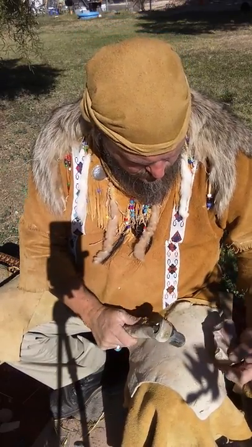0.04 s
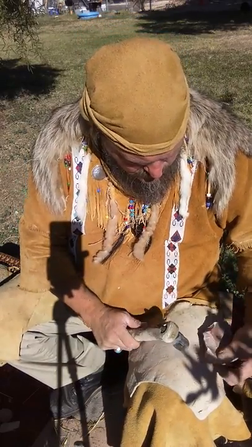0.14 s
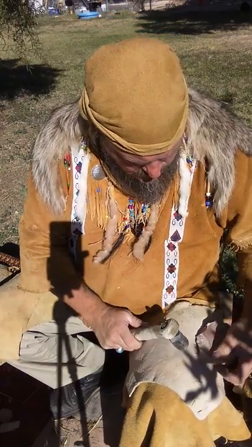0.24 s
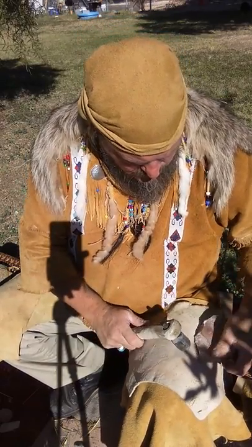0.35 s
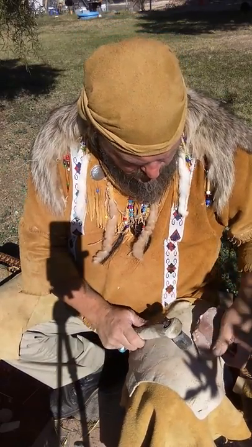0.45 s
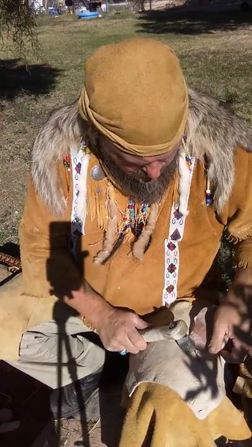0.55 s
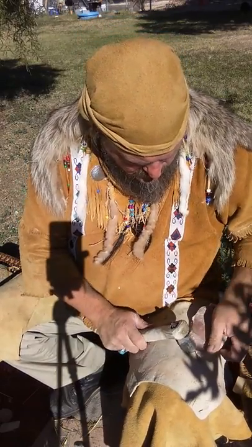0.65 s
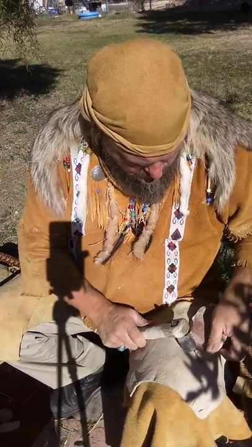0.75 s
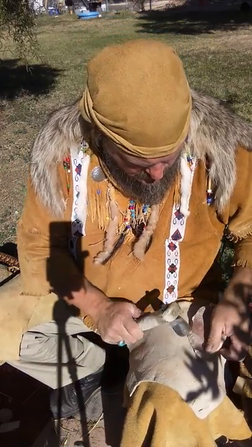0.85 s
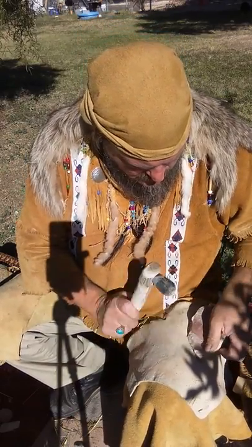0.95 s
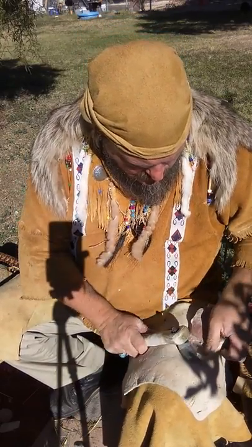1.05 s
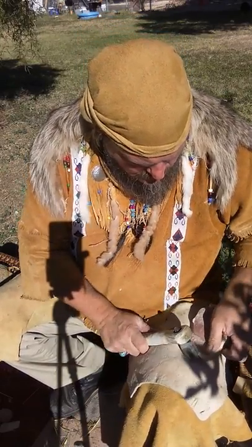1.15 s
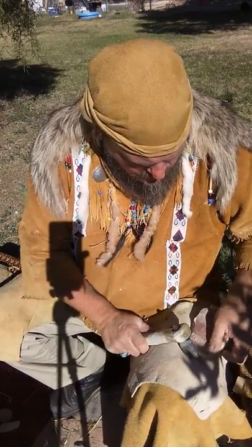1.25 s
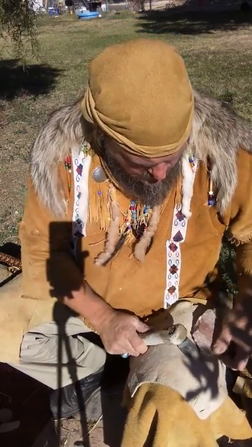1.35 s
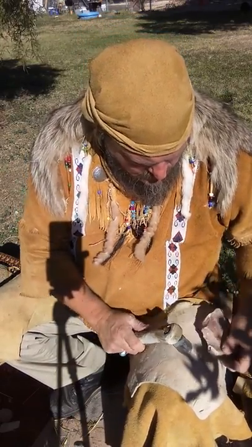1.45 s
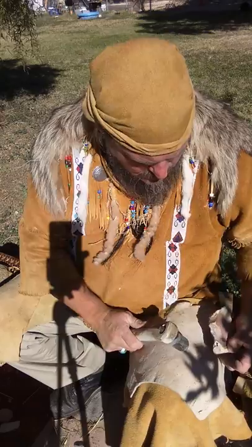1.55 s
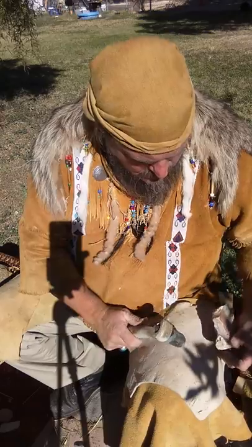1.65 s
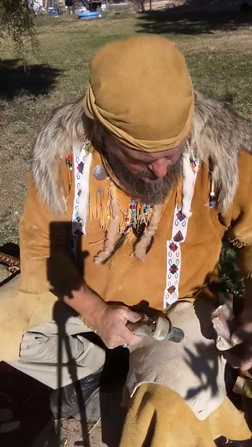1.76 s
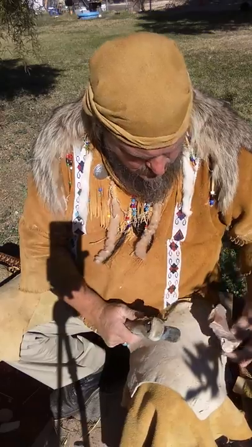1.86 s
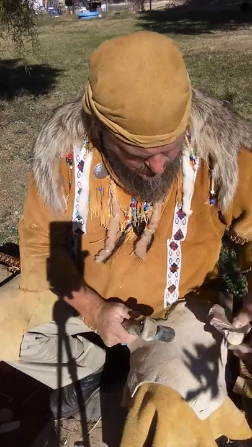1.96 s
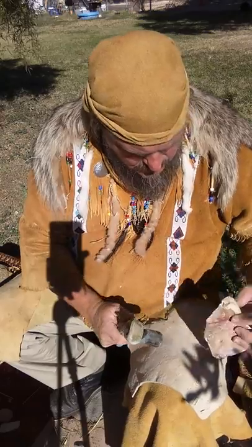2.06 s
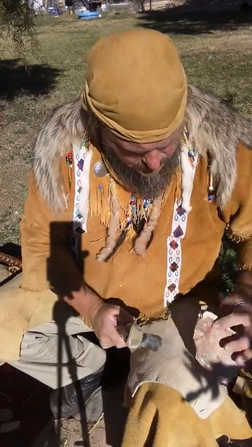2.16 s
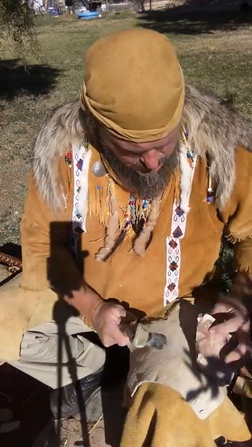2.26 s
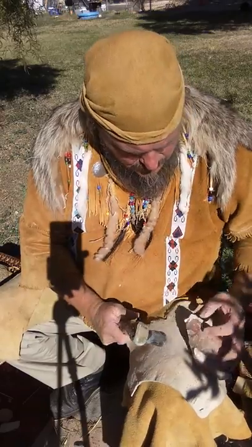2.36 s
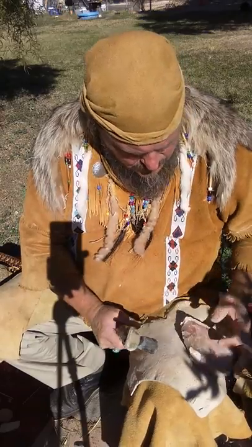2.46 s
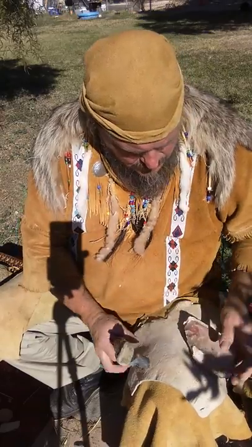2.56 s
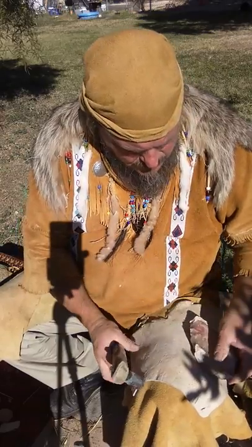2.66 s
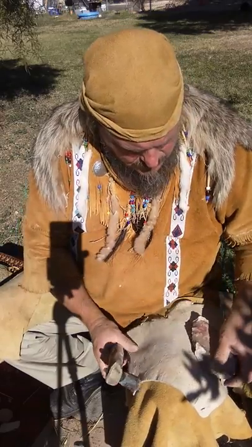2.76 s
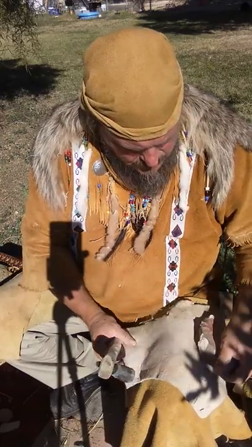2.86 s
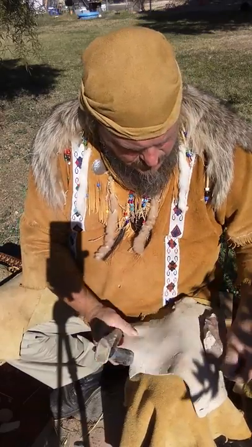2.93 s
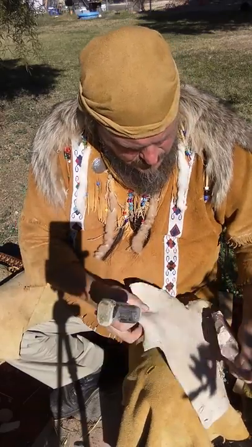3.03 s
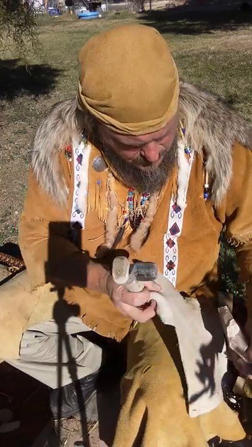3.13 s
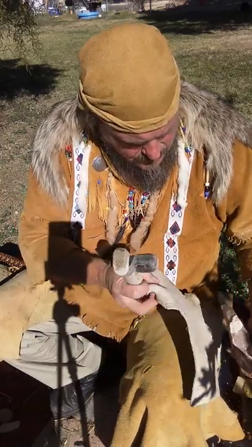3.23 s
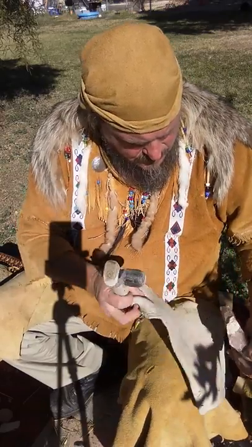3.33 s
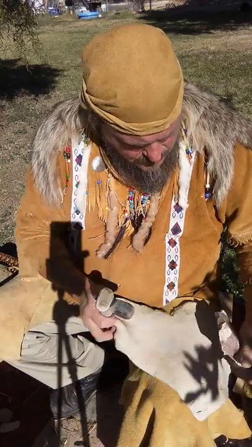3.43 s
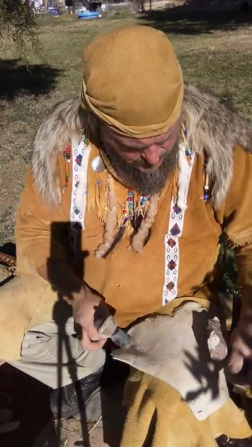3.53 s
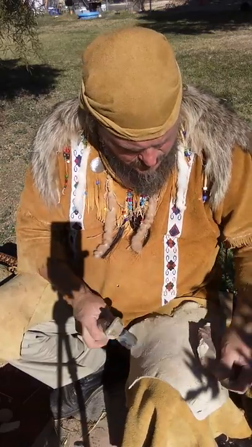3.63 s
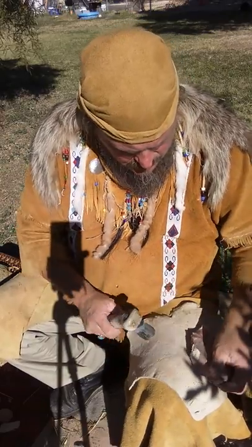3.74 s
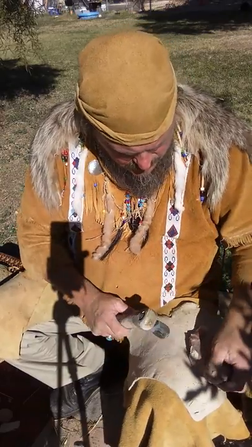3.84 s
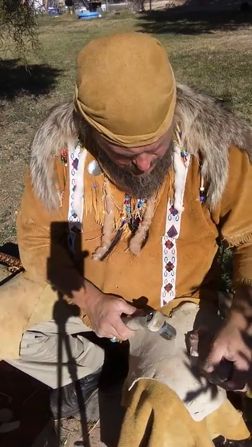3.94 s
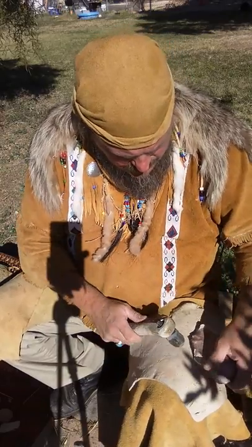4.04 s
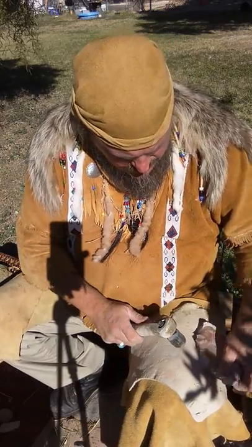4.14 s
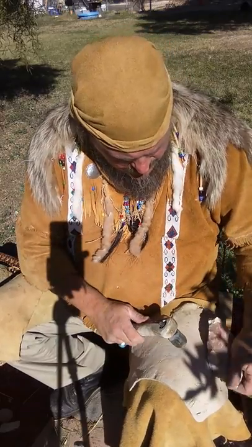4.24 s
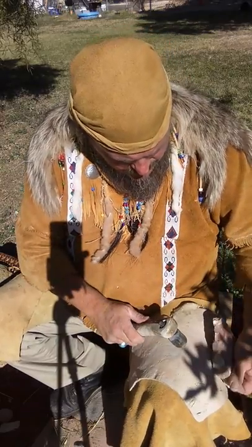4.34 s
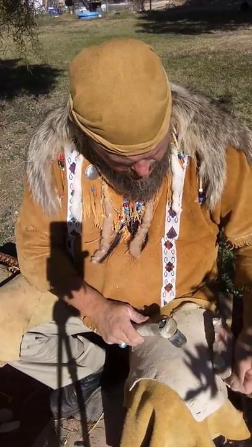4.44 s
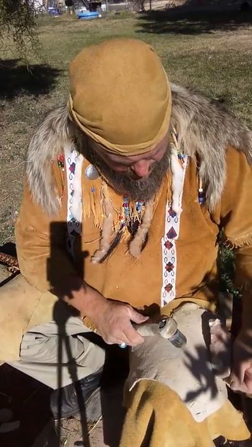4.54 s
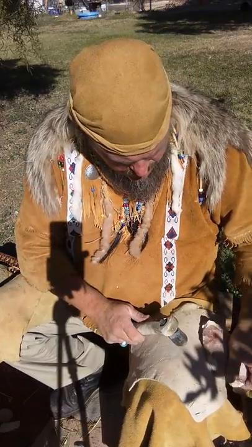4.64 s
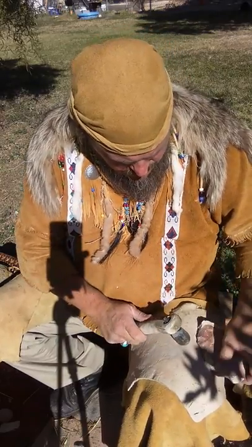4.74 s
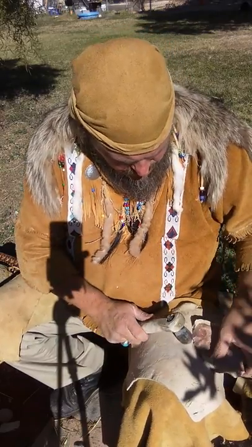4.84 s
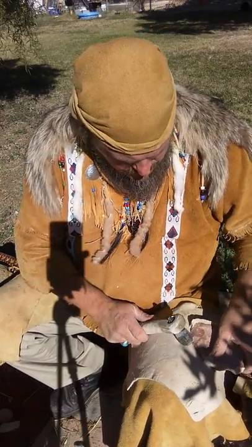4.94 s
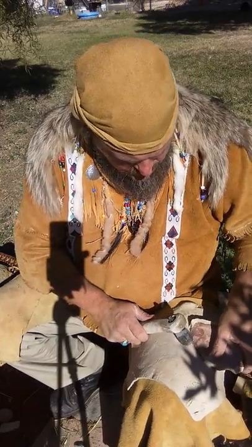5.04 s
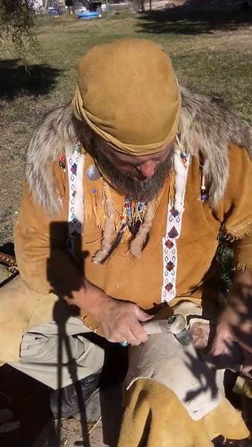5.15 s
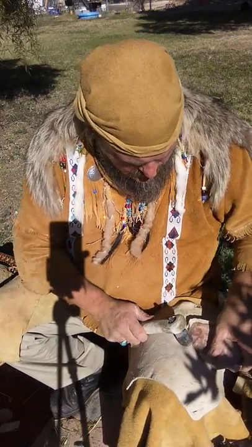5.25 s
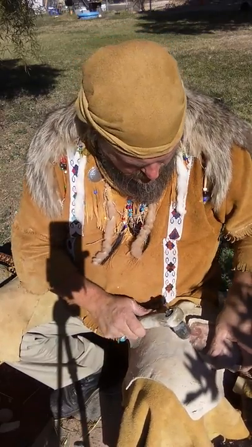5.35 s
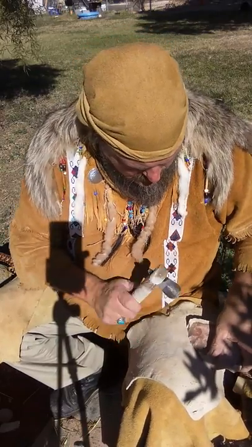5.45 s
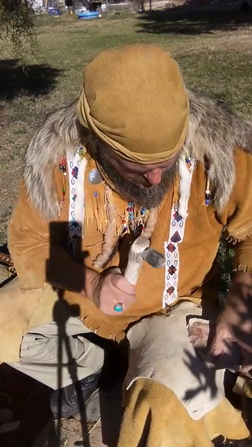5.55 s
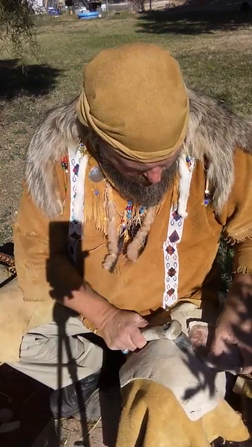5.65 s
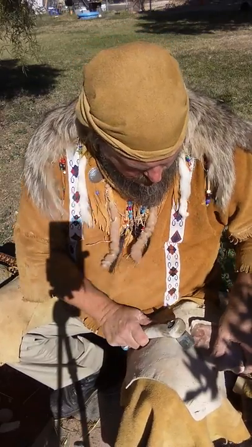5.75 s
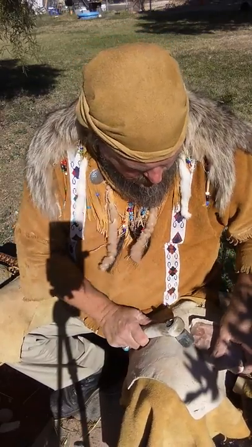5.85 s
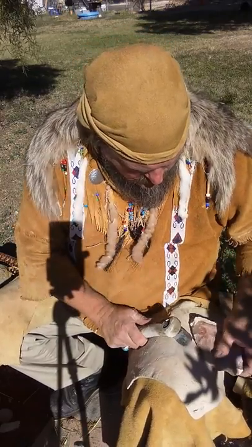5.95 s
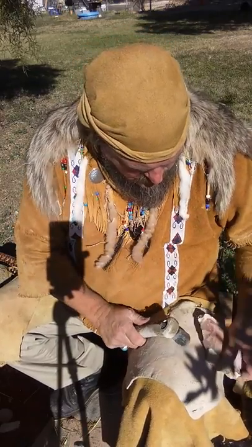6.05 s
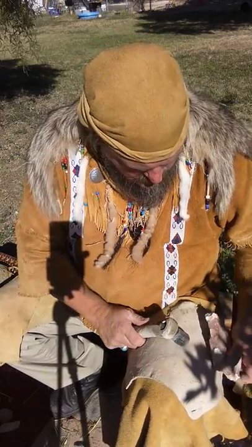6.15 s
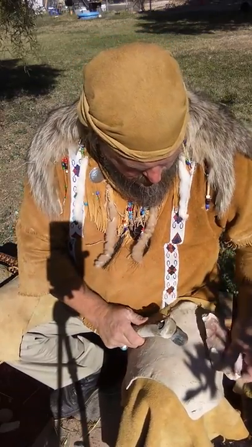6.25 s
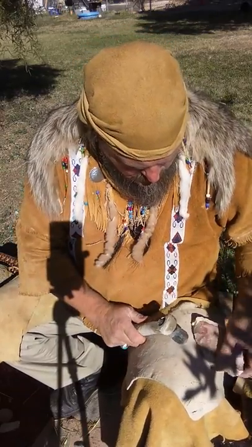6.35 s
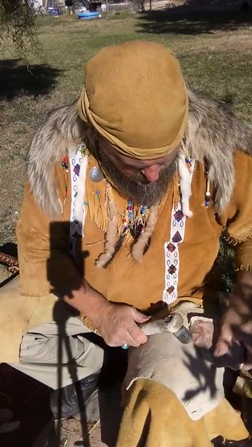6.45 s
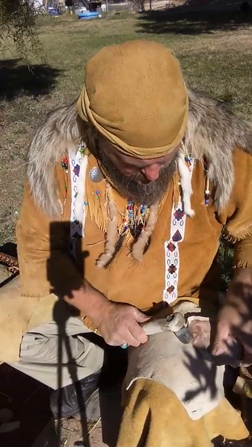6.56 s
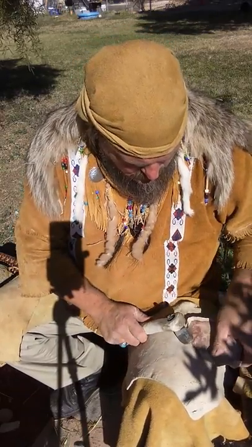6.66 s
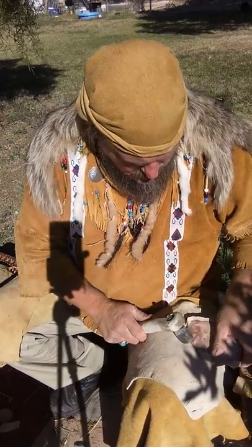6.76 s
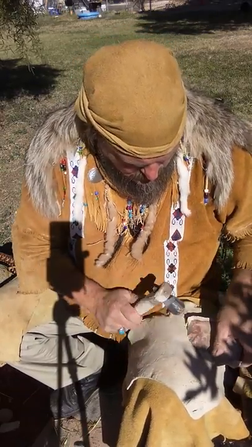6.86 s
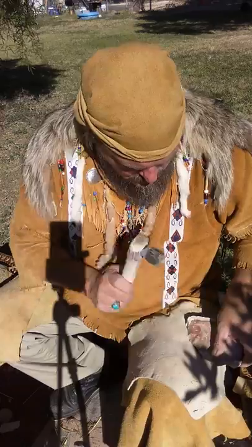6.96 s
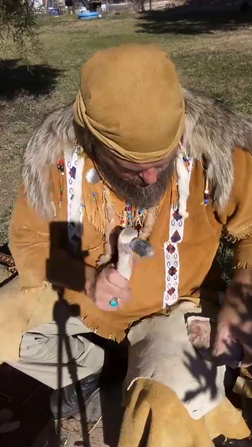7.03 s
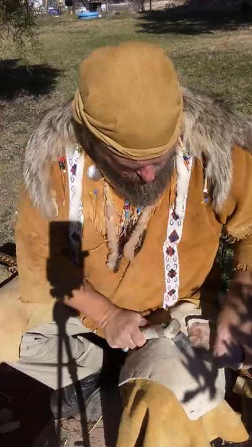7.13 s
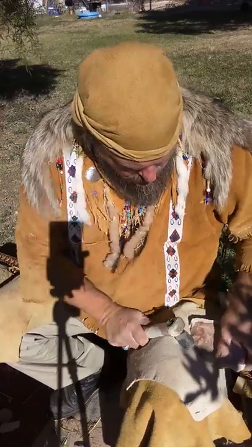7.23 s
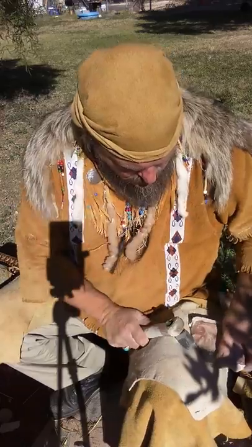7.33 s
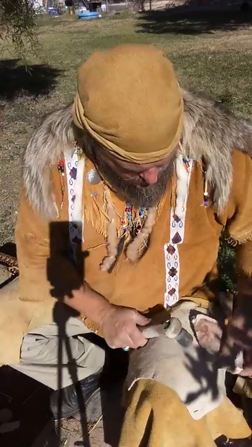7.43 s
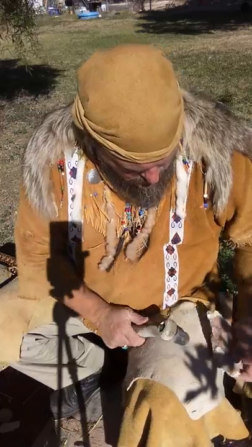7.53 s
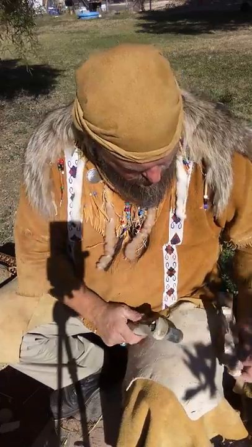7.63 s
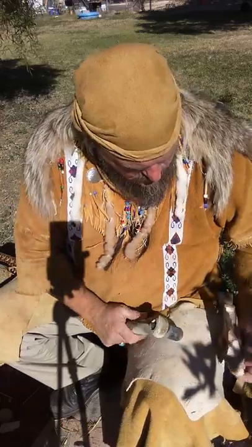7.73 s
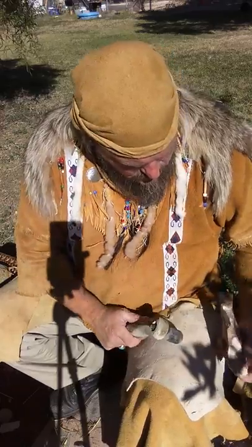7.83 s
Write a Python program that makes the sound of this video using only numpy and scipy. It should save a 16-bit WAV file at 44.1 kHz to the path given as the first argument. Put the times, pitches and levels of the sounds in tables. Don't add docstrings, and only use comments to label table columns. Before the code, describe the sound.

A hammer strikes flint held on a leather-covered thigh, recorded close in an open yard. One dry, bright click, a long pause of leather rubbing and tiny ticks, then two loud snapping blows about one and a half seconds apart, scattering small clinking chips. Wind rumbles and pops unevenly on the microphone over faint traffic, crickets, brief bird whistles, a descending distant whine and two faraway barks.

```python
import sys
import numpy as np
from scipy import signal
from scipy.fft import rfft, irfft, next_fast_len
from scipy.io import wavfile
from scipy.ndimage import uniform_filter1d, map_coordinates

SR = 44100
rng = np.random.default_rng(int(sys.argv[2]) if len(sys.argv) > 2 else 0)


def gain_from_db(level_db):
    decades = np.asarray(level_db, float) / 20
    return 10 ** decades


def to_wav(sig):
    pcm = np.clip(np.atleast_2d(sig), -1, 1) * 32767
    pcm = np.round(pcm).astype(np.int16)
    wavfile.write(sys.argv[1], SR, pcm.T)


N = 347949
T = np.arange(N) / SR

# time in seconds, peak in dB, left-right in dB, thigh thump in dB, slap-back in dB.
BLOWS = [
    (0.9725, -6, 9, -40, -50),
    (5.5808, -1.5, 6.5, -19.5, -32),
    (7.042, -2.5, 6, -16.5, -37),
]
# frequency in Hz, level in dB, t60 in seconds.
STONE_MODES = [
    [(1002, -16, 0.024), (1500, -11, .03), (1675, -1.5, 0.037), (1945, -9, .03), (2300, -4, .03),
     (2600, -10.5, 0.06), (3450, -6.5, 0.033), (3760, -8, 0.038), (4360, -11, 0.039), (5960, -19, .04),
     (9400, 2.5, .05), (13080, -14.5, .045), (14930, -13.5, .022)],
    [(1503, -5.5, .05), (1950, -7.5, .05), (2220, -10, 0.029), (2691, -7.5, 0.056), (3430, -7, .045),
     (3410, -1.5, .04), (3830, -7.5, 0.034), (4405, -10.5, .035), (4740, -12, .035), (5620, -12.5, 0.026),
     (7704, -14.5, .04), (8440, -14.5, .05), (12990, -18, .032)],
    [(1498, -8.5, 0.049), (1640, -10.5, 0.044), (1950, -12, .04), (2208, -3.5, .04), (2690, -11, 0.075),
     (3286, -7, 0.036), (3476, -1, .05), (3975, -9.5, 0.036), (4060, -9, .04), (4680, -8, 0.057),
     (5480, -14, .05), (8200, -18, 0.089), (10070, -18, 0.041), (12300, -23.5, 0.053)],
]
# frequency in Hz, density in dB per Hz.
CRACK_SPECTRA = [
    [(88, -55), (250, -13), (500, -20), (1160, -10), (1680, -4.5), (2000, -7.5), (2400, -5.5), (2910, -14),
     (3470, -6), (7600, -23), (9440, -10.5), (10400, -27), (13400, -16), (16400, -46)],
    [(160, -36), (280, -25), (420, -16), (1130, -21), (1500, -12), (3060, -13), (3520, -4.5), (4110, -10),
     (5600, -12.5), (6850, -21), (7520, -9.5), (9500, -22.5), (13000, -23), (15100, -27), (16400, -43)],
    [(180, -44.5), (300, -14), (500, -16), (720, -18.5), (968, -16), (1520, -16.5), (1950, -13), (2270, -7),
     (2600, -18), (3630, -6.5), (5420, -18.5), (8950, -21), (12700, -23), (14800, -30), (16400, -49)],
]
CRUSH_S = [0.004, 0.0035, .005]
# frequency in Hz, level over the thump in dB, t60 in seconds.
THIGH_MODES = [(330, 7.5, 0.012), (444, 4, 0.051), (617, 5.5, 0.063), (700, 9, 0.049)]
# frequency in Hz, level in dB.
GRIT_SPECTRUM = [(600, -29), (1400, -9.5), (1900, -11.5), (2600, -1), (3200, -7.5), (3800, -2.5),
                 (4500, -11), (6500, -17), (12000, -24.5), (16000, -39)]
LEAD_S, LEAD_DB = .0013, -20.5
# delay in seconds, level in dB.
WALLS = [(.035, -40), (.078, -44), (.1, -48)]
# frequency in Hz, t60 in seconds.
YARD_T60 = [(300, 0.055), (1500, 0.95), (3500, 0.14), (6000, 0.13), (12000, 0.039)]
# frequency in Hz, level in dB.
ECHO_COLOUR = [(300, -17), (1000, -13.5), (2000, -3.5), (3800, -1.5), (4600, -4.5), (6000, -12),
               (9000, -16.5), (16000, -32)]
# frequency in Hz, gain in dB.
PORT_SHADE = [(250, 15), (500, 6), (1100, 2), (1800, 6), (2600, 4.5), (3300, 1.5), (4300, -0.23),
              (9000, -2)]
# frequency in Hz, phase in radians.
PORT_LAG = [(250, -2.5), (800, -2), (1600, -1.5), (2500, -1.28), (3300, 1.04), (5000, 1.63), (8000, 1.93),
            (12000, 0.8)]

# time in seconds, peak in dB, centre in Hz, t60 in seconds,
# left-right in dB.
TAPS = [(0.001, -44, 1500, 0.011, -1), (0.255, -60.5, 3880, 0.21, 19), (0.275, -52.5, 3460, 0.081, 23),
        (0.508, -56, 3930, 0.055, 21), (.752, -44.5, 4400, 0.015, 19), (1.245, -54.5, 4170, 0.082, 17),
        (1.262, -54.5, 4164, 0.092, 16), (3.5215, -44, 899, .04, 7), (3.5205, -32.5, 343, 0.035, 16.5),
        (2.6345, -43, 3848, 0.018, 22), (3.5256, -26.5, 1120, 0.02, 18), (3.527, -47, 3620, 0.019, 14),
        (4.646, -57, 5920, 0.018, 25), (7.12, -39, 2600, 0.019, 6), (7.138, -38, 2800, 0.018, 23),
        (7.152, -45, 2800, 0.13, 22)]
# time in seconds, peak in dB, centre in Hz, t60 in seconds, left-right in dB.
CLINKS = [
    (2.197, -54, 4780, 0.017, 11),
    (4.646, -56, 1757, 0.032, 18),
    (5.128, -48.5, 4590, 0.018, 5.9),
    (6.485, -48, 3560, 0.054, 9.1),
]
# time in
# seconds, peak in dB, centre in Hz, t60 in seconds,
FLAKES = [(1.002, -38, 1620, .04, 13), (1.024, -44, 1500, .06, 18), (1.051, -57, 2380, .03, 17),
          (1.069, -56, 2650, 0.028, 9), (1.085, -41.5, 1640, 0.044, 12), (1.109, -45, 1500, 0.073, 12),
          (1.115, -54, 3790, 0.027, 11), (1.171, -54, 1500, 0.031, 15), (5.606, -30.5, 2590, 0.035, 11),
          (5.638, -32.5, 3700, 0.045, 19), (5.659, -37, 2500, .03, 8), (5.67, -42.5, 3570, 0.077, 17),
          (5.678, -41, 2640, 0.033, 18), (5.689, -37, 3880, 0.079, 10), (5.693, -43, 2850, 0.068, 19),
          (5.7155, -42, 1650, 0.042, 15), (5.7, -44, 3500, .03, 6), (5.72, -35, 3730, 0.07, 14),
          (7.071, -32, 2686, .04, 16), (7.104, -41, 3900, .03, 18), (7.149, -43, 3660, 0.036, 14),
          (7.158, -44, 2700, .03, 6), (7.1765, -37, 2300, .03, 8), (7.181, -39, 1510, 0.035, 14),
          (7.182, -43, 4020, 0.089, 18)]
# time in seconds, peak in dB, centre in Hz.
TICKS = [(0.5065, -38, 12800), (0.7526, -40.5, 9000), (2.31, -48, 11200), (2.339, -50, 9300),
         (2.361, -45, 7600), (2.3759, -46, 12400), (2.5292, -34.5, 12400), (3.039, -49.5, 8400),
         (3.1898, -43.5, 9070), (3.266, -42, 9150), (3.3187, -39.5, 9050)]
TICK_T60_S, TICK_PAN_DB = 0.0079, 16.5
TAP_WIDE, CLINK_WIDE, FLAKE_WIDE = 0.7, 0.2, .11

# start in seconds, length in seconds, level in dB,
# bright hiss over dull rub in dB.
MOVES = [(0.246, 0.2, -71.5, -3.5), (0.507, 0.1, -64.5, -0.5), (0.598, 0.27, -69.5, -6),
         (1.0, 0.35, -73, 1.5), (1.915, 0.15, -77.5, 4), (2.15, .15, -80.5, 3), (2.309, 0.21, -69.5, -1),
         (2.519, 0.2, -68, -2.5), (2.724, 0.17, -68.5, -3), (2.867, 0.19, -68.5, -1.5),
         (3.003, 0.067, -63.5, -9), (3.07, 0.62, -73.5, -2), (3.479, 0.68, -74.5, -15),
         (3.932, 0.34, -68, -0.5), (5.277, 0.22, -76, -22), (5.548, 0.39, -69.5, -6.5),
         (5.851, 0.47, -75, -24.5), (6.4, 0.23, -77.5, 1.5), (6.818, 0.078, -78, -1),
         (7.013, 0.32, -68.5, -2.5), (7.298, 0.36, -71.5, -9)]
MOVE_EDGE_S = .035, 0.14
STILL_DB = -80.5
# frequency in Hz, level in dB.
RUB_SPECTRUM = [(400, -25.5), (1000, 0.5), (2500, -3.5), (4500, -3), (6000, -13), (9000, -26)]
# frequency in Hz, level in dB.
HISS_SPECTRUM = [(3500, -26.5), (6000, -3), (9000, 3.5), (13000, 0), (15600, -2), (16200, -32)]
# end of the arm's swing in seconds, level in dB.
SWISHES = [
    (.97, -72.5),
    (5.581, -53.5),
    (7.041, -54.5),
]
# start in seconds, length in seconds, first pitch in Hz, last pitch in Hz,
# level in dB.
AIRY_NOTES = [(3.55, .55, 4800, 5450, -75), (2.14, .3, 9330, 9310, -79), (2.55, .17, 9330, 9300, -79),
              (.6, .2, 4620, 4750, -72), (.63, .13, 5600, 5620, -77), (7.42, .3, 3950, 4120, -72),
              (7.35, .36, 1420, 1380, -71), (2.89, .08, 6000, 6300, -75), (2.84, .16, 7000, 7800, -79)]
EDGE_SHARE, EDGE_DB = .3, 14

# time in seconds, level in dB.
BREEZE = [(0, -49), (.3, -48), (1.5, -51.5), (2.25, -50), (2.9, -43.5), (4.3, -44), (4.7, -47),
          (5.4, -46.5), (5.85, -39), (6.0, -33.5), (6.7, -37), (7.2, -39.5), (7.89, -45)]
SHELTER_DB = 6
# start in seconds, length in seconds, level in dB, left-right in dB.
GUSTS = [(0.1, 0.24, -56.5, -17.5), (0.958, 0.44, -52.5, 8), (3.246, 0.39, -44.5, -5),
         (4.119, 0.14, -45, -10), (4.842, 0.15, -42, -13.5), (5.148, 0.051, -45, -12.5),
         (5.43, 0.14, -41, -20.5), (5.677, 0.25, -41, -17.5), (5.951, 0.313, -32.5, -2.5),
         (6.469, 0.13, -30, 1.5), (7.104, 0.08, -53, -18), (7.413, 0.1, -39, 4.5), (7.81, 0.14, -49.5, 7)]
GUST_EDGE_S = .03, .05
# frequency in Hz, level in dB.
WIND_SPECTRUM = [(20, -48.5), (30, -27), (40, -10), (50, 0), (65, -1), (95, -3.5), (140, -14), (250, -22.5),
                 (330, -33), (500, -49.5), (900, -90.5)]
# time in seconds, peak in dB, left-right in dB.
POPS = [(0.217, -31, -18), (.721, -38, 18), (3.729, -44.5, 8), (4.161, -40, -5), (4.851, -35.5, -2),
        (4.88, -32.5, -14), (4.939, -32, -21), (5.105, -36, -17), (5.15, -25.5, -17.5),
        (5.254, -37.5, -16.5), (5.432, -26, -15), (5.46, -27, -20), (5.757, -28, -12), (5.92, -27, -8),
        (6.08, -38, -5), (6.17, -28, -9), (6.471, -29, 3.5), (6.546, -23, 7)]
POP_HZ, POP_WIDE_HZ, POP_EDGE_HZ = 73, 54.4, 320

# time in seconds, middle pitch in Hz, level in dB.
BARKS = [
    (3.197, 530, -52),
    (5.795, 555.2, -51),
]
# frequency in Hz, level in dB.
MUZZLE = [(300, -10), (550, -1), (1100, -1), (1650, -11), (2200, -13), (2700, -24), (4000, -50)]
BARK_S, BARK_RISE, BARK_BEND = .165, 0.22, 0.49
BARK_OPEN_DB, BARK_ECHO_S = 15, .195
CHEST_HZ = (660, 615)
CHEST_DB = -9
# start in seconds, length in seconds, first pitch in Hz, last pitch in Hz, level in dB.
BIRD_NOTES = [(0, 0.052, 5420, 4900, -67.5), (4.473, 0.13, 5430, 4960, -73),
              (6.075, 0.054, 3530, 3800, -65), (6.111, 0.02, 4230, 4280, -67.5),
              (6.133, 0.017, 3900, 4050, -68), (6.135, .03, 3600, 3680, -76),
              (6.159, .018, 3820, 4000, -71), (6.205, 0.042, 3390, 3840, -67),
              (6.228, 0.075, 3830, 3650, -63), (6.269, 0.071, 3820, 3800, -71)]
# time in seconds, pitch in Hz, level in dB.
CHIRP = [(1.958, 2333, -75.5), (1.97, 2604, -69), (1.99, 3610, -68), (2.004, 3800, -63.5),
         (2.025, 3720, -62), (2.06, 3290, -62.5), (2.1, 3174, -64), (2.12, 3006, -61.5),
         (2.138, 2850, -69.5)]
# time in seconds, pitch in Hz, level in dB.
WHINE_PASSES = [
    [(0, 1860, -62.5), (.06, 1820, -69), (.1, 1820, -72), (.2, 1764, -73.5), (.3, 1790, -65),
     (.34, 1780, -80)],
    [(0, 1752, -74), (.13, 1778, -68), (.17, 1744, -74.5), (.26, 1718, -62.5), (.36, 1690, -81)],
    [(.47, 1718, -77), (.57, 1721, -61.5), (.62, 1698, -66.5), (.8, 1655, -66.5), (.9, 1650, -78),
     (.96, 1550, -83)],
    [(2.3, 1553, -72), (2.37, 1547, -61.5), (2.45, 1548, -69), (2.56, 1540, -67), (2.65, 1500, -55.5),
     (2.78, 1483, -64), (2.9, 1455, -69), (3.0, 1464, -61.5), (3.11, 1430, -54.5), (3.22, 1434, -61),
     (3.3, 1412, -55.5), (3.5, 1421, -63), (3.63, 1348, -58), (3.75, 1375, -66.5), (4.1, 1322, -78)],
]
# multiple of the pitch, level in dB, dB lost per share of pitch lost.
WHINE_ORDERS = [(.5, -5, 240), (1, 0, 0), (2, -17, 0)]
FLUTTER_DB = 1.4

# time in seconds, level in dB.
MURMUR = [(0.0, -73.5), (0.5, -72), (1.1, -71.5), (1.6, -75.5), (2.26, -74), (2.45, -69), (3.43, -65.5),
          (4.5, -72), (5.25, -75), (5.6, -65), (6.1, -66.5), (6.4, -75), (7.29, -69.5), (7.89, -73.5)]
# frequency in Hz, level in dB.
ROAD_SPECTRUM = [(120, -2), (250, -2.5), (600, -5), (1000, -7.5), (1400, -17.5), (2500, -29.5)]
# pitch in Hz, pulses a second, level in dB.
CRICKETS = [(4850, 31, -87), (3800, 29, -90), (3100, 27, -93)]
# frequency in Hz, level in dB.
AIR_SPECTRUM = [(88, -32.5), (150, -2), (348, -15.5), (422, -4), (637, -17.5), (871, -3.5), (2360, -26),
                (3100, -18), (4860, -14), (5680, -26.5), (16000, -24)]
AIR_DB, CLOSED_DB = -78.5, -120
TOP_HZ = 16050


def blows():
    out, t = np.zeros((2, N)), np.arange(SR // 2) / SR
    for blow, modes, crack, crush_s in zip(BLOWS, STONE_MODES, CRACK_SPECTRA, CRUSH_S):
        s, db, pan_db, thump_db, slap_db = blow
        rise = 1 - np.exp(-(t / 0.0004) ** 2)
        ring = gain_from_db(db - 10.0) * ringing(modes, t) + gain_from_db(thump_db - 8.5) * ringing(THIGH_MODES, t)
        hit = rise * (gain_from_db(db - 8.5) * crushing(crack, crush_s, t) + ring)
        add(out, s - .001, ports(hit, pan_db) + rise * crackling_grit(db, t))
        add(out, s - .001 - LEAD_S, ports(gain_from_db(LEAD_DB) * hit, pan_db))
        add(out, s + 0.0025, thigh_thump(thump_db, t) * [[1.2], [.4]])
        add_blow_echoes(out, s, hit[0], db, slap_db, t)
    return out


def crushing(crack, crush_s, t):
    grind = noise(crack, 0.46, n=len(t))
    body = filtered(grind, lambda hz: 1 / (1 + (hz / 5500) ** 6))
    snap_gain = gain_from_db(9.0 - 60 * t / 0.018) + gain_from_db(-10.5 - 60 * t / 0.1)
    after = np.maximum(t - crush_s, 0)
    body_gain = gain_from_db(-60 * after / 0.035) + gain_from_db(-12.0 - 60 * after / 0.1)
    return (grind - body) * snap_gain + body * body_gain


def ringing(modes, t):
    out = 0
    for hz, db, t60 in modes:
        phase = 2 * np.pi * (hz * t + rng.random()) + 0.31 * wobble(150, len(t))
        out = out + gain_from_db(db - 60 * t / t60) * np.sin(phase)
    return out


def crackling_grit(db, t):
    clumps_db = 3.1 * wobble(46, len(t)) + 2.7 * wobble(900, len(t))
    return gain_from_db(db - 40.5 - 60 * t / .52 + clumps_db) * noise(GRIT_SPECTRUM, .55, n=len(t))


def thigh_thump(thump_db, t):
    return -gain_from_db(thump_db + 6 - 60 * t / .085) * np.sin(2 * np.pi * 66 * t) * (1 - np.exp(-t / .004))


def add_blow_echoes(out, s, hit, db, slap_db, t):
    dull = filtered(hit, lambda hz: gain_from_db(along(ECHO_COLOUR, hz)))
    for delay_s, wall_db in WALLS + [(.1365, slap_db)]:
        add(out, s + delay_s, ports(gain_from_db(wall_db) * dull, 3 * rng.standard_normal()))
    blur = gain_from_db(db - 11.0 - 60 * t / 0.14) * noise(ECHO_COLOUR, 0.81, n=len(t))[0]
    tail = gain_from_db(-29.5) * echoes(dull, t60_scale=1.0) + gain_from_db(-32.5) * echoes(blur, t60_scale=0.93)
    add(out, s + 0.0097, tail)


def taps():
    out, t = np.zeros((2, N)), np.arange(SR // 8) / SR
    ticks = [row + (TICK_T60_S, TICK_PAN_DB) for row in TICKS]
    for rows, wide in [(TAPS + ticks, TAP_WIDE), (CLINKS, CLINK_WIDE), (FLAKES, FLAKE_WIDE)]:
        for s, db, hz, t60, pan_db in rows:
            band = lambda f: (1j * f * wide * hz / (hz * hz - f * f + 1j * f * wide * hz)) ** 2
            shape = gain_from_db(-60 * t / t60) * (1 - np.exp(-t / .0004))
            burst = unit(filtered(rng.standard_normal(len(t)), band))
            add(out, s, ports(gain_from_db(db - 5.5) * shape * burst, pan_db))
    return out


def rustle():
    power = sum(gain_from_db([[db], [db + bright_db]]) ** 2 * swell(s, length, *MOVE_EDGE_S)
                for s, length, db, bright_db in MOVES)
    dull, bright = np.sqrt(power + gain_from_db(STILL_DB) ** 2) * gain_from_db(1.5 * wobble(9))
    grain = wobble(50)
    rub_grain = gain_from_db(0.78 * grain + 1.7 * wobble(170))
    rub = unit(rub_grain * patchy(noise(RUB_SPECTRUM, 0.089), depth_db=2.5))
    hiss_grain = gain_from_db(0.75 * grain + 1.5 * wobble(330))
    hiss = unit(hiss_grain * patchy(noise(HISS_SPECTRUM, 0.068), depth_db=2.5))
    swish = sum(gain_from_db(db) * np.interp(T, [s - .06, s - .035, s], [0, .7, 1], right=0) for s, db in SWISHES)
    airy = sum(glide(note(*row), lone_partial, breath=.95, breath_hz=500, waver=.004) for row in AIRY_NOTES)
    return (dull * gain_from_db(5.5) + swish) * rub + (bright * gain_from_db(2.56) + .3 * swish) * hiss + ports(airy, 8.9)


def wind():
    breeze = gain_from_db(curves(BREEZE)[0] - np.array([[0], [SHELTER_DB]]))
    gust_power = sum(panned(gain_from_db(db), pan_db) ** 2 * swell(s, length, *GUST_EDGE_S)
                     for s, length, db, pan_db in GUSTS)
    lumps = gain_from_db(2.8 * np.array([wobble(14), wobble(14)]) + 1.5 * wobble(25))
    return np.sqrt(breeze ** 2 + gust_power) * unit(lumps * noise(WIND_SPECTRUM, -0.47))


def pops():
    kicks = np.zeros((2, N))
    for s, db, pan_db in POPS:
        add(kicks, s, panned(-gain_from_db([db]), pan_db))

    def boom(f):
        resonance = (1j * f / (POP_HZ ** 2 - f * f + 1j * f * POP_WIDE_HZ)) ** 2
        return resonance * POP_HZ * SR / 9 / (1 + 1j * f / POP_EDGE_HZ) ** 2
    return filtered(kicks, boom)


def whine():
    orders = lambda hz: [(k, db - fade_db * (1 - hz / hz[0])) for k, db, fade_db in WHINE_ORDERS]
    tone = sum(glide(rows, orders, breath=.36, breath_hz=70, waver=.007) for rows in WHINE_PASSES)
    tone = tone * gain_from_db(FLUTTER_DB * wobble(7))
    return tone * [[1.7], [.4]] + gain_from_db(-9.5) * echoes(tone, t60_scale=1.0)[:, :N]


def dog():
    voice = sum(glide(bark(*row), throat, breath=.33, breath_hz=150, waver=.01) for row in BARKS)
    for s, hz, db in BARKS:
        chest = note(s + .08, BARK_S - .09, *CHEST_HZ, db + CHEST_DB)
        voice = voice + glide(chest, lone_partial, breath=.5, breath_hz=120, waver=.01)
    answered = voice + .25 * np.roll(voice, round(BARK_ECHO_S * SR))
    near = gain_from_db(-10) * echoes(answered, t60_scale=.3)[:, :N]
    high = filtered(voice, lambda hz: 1 / (1 + (800 / (hz + 1)) ** 4))
    tail = gain_from_db(-15.0) * echoes(np.pad(high, (5800, 0)), t60_scale=0.51)[:, :N]
    return voice * [[1.6], [.3]] + near + tail


def throat(hz):
    effort = np.linspace(-1, 1, len(hz)) ** 2
    return [(k, along(MUZZLE, k * hz) - BARK_OPEN_DB * np.sqrt(k - 1) * effort) for k in range(1, 7)]


def bark(s, hz, db):
    return [(s + u * BARK_S, hz * (1 - BARK_RISE * max(1 - u / BARK_BEND, 0) ** 1.4), db - down)
            for u, down in [(0, 18), (.15, 2.5), (.3, -1.5), (.5, -0.5), (.8, 4.5), (1, 9)]]


def birds():
    tracks = [note(*call) for call in BIRD_NOTES] + [CHIRP]
    song = sum(glide(rows, lone_partial, breath=.3, breath_hz=150, waver=.005) for rows in tracks)
    tail = gain_from_db(-5.5) * echoes(np.pad(song, (900, 0)), t60_scale=1.0)[:, :N]
    return panned(song, 19.5) + tail


def traffic():
    level = gain_from_db(curves(MURMUR)[0] + 6.5 + 2.1 * wobble(3.7))
    return level * patchy(noise(ROAD_SPECTRUM, -0.38), depth_db=4.0)


def crickets():
    out = np.zeros((2, N))
    for hz, rate, db in CRICKETS:
        stroke_phase = 2 * np.pi * np.cumsum(rate * (1 + 0.22 * wobble(5.0))) / SR
        beat = np.maximum(np.sin(stroke_phase), 0) ** 3
        wing_hz = hz * (1 + 0.019 * wobble(4.6) + .02 * wobble(410))
        wing = np.sin(2 * np.pi * np.cumsum(wing_hz) / SR)
        out += panned(gain_from_db(db + 2.5 * wobble(12)) * unit(beat * wing), rng.normal(0, 3))
    return out


def air():
    return gain_from_db(AIR_DB) * noise(AIR_SPECTRUM + [(16300, CLOSED_DB)], .1)


def ports(x, pan_db):
    left, right = x * np.ones((2, 1))
    response = lambda hz: gain_from_db(along(PORT_SHADE, hz)) * np.exp(-1j * along(PORT_LAG, hz))
    return panned(np.array([left, filtered(right, response)]), pan_db)


def echoes(x, t60_scale):
    hz, t, z = signal.stft(rng.standard_normal((2, SR)), SR, nperseg=256)
    decay = gain_from_db(-60 * t / along(YARD_T60, hz)[:, None] / t60_scale)
    tail = signal.istft(z * decay, SR, nperseg=256)[1]
    return signal.fftconvolve(np.atleast_2d(x), tail / np.linalg.norm(tail[0]), axes=1)


def glide(rows, orders, breath, breath_hz, waver):
    out, span = np.zeros(N), slice(round(rows[0][0] * SR), round(rows[-1][0] * SR))
    hz, db = [curve[span] for curve in curves(rows)]
    n = len(hz)
    gate = np.clip(np.minimum(T[:n], T[:n][::-1]) / 0.0048, 0, 1)
    phase = 2 * np.pi * np.cumsum(hz * (1 + waver * wobble(50, n))) / SR
    for k, level_db in orders(hz):
        smear = 1 - breath + breath * (wobble(breath_hz, n) + 1j * wobble(breath_hz, n))
        partial = np.imag(smear * np.exp(1j * k * phase))
        out[span] += np.sqrt(2) * gate * gain_from_db(db + level_db) * partial
    return out


def lone_partial(hz):
    return [(1, 0)]


def note(s, length, first_hz, last_hz, db):
    return [(s + u * length, first_hz + u * (last_hz - first_hz), db - down)
            for u, down in [(0, EDGE_DB), (EDGE_SHARE, 0), (1 - EDGE_SHARE, 0), (1, EDGE_DB)]]


def swell(s, length, rise_s, fall_s):
    return np.clip(np.minimum((T - s) / rise_s + .5, (s + length - T) / fall_s + .5), 0, 1) ** 2


def patchy(x, depth_db):
    z = signal.stft(x, nperseg=512)[2]
    field = uniform_filter1d(rng.standard_normal(z.shape[1:]), size=9, axis=0)
    field = uniform_filter1d(field, size=12, axis=1)
    return signal.istft(z * gain_from_db(depth_db * unit(field)), nperseg=512)[1][:, :N]


def noise(spectrum, alike, n=N):
    a, b = filtered(rng.standard_normal((2, n)), lambda hz: gain_from_db(along(spectrum, hz)))
    turn = np.arccos(np.clip(alike, -1, 1)) / 2
    mid, side = np.cos(turn) * a, np.sin(turn) * b
    return unit(np.array([mid + side, mid - side]))


def wobble(rate_hz, n=N):
    return map_coordinates(rng.standard_normal(int(n * rate_hz / SR) + 4), [T[:n] * rate_hz])


def filtered(x, response):
    n = x.shape[-1]
    m = next_fast_len(n + 4096)
    return irfft(rfft(x, m) * response(np.fft.rfftfreq(m, 1 / SR)), m)[..., :n]


def along(points, hz):
    f, v = np.transpose(points)
    return np.interp(np.log(hz + 1), np.log(f + 1), v)


def curves(rows):
    s, *cols = np.transpose(rows)
    return [np.interp(T, s, c) for c in cols]


def unit(x):
    return x / np.sqrt(np.mean(x ** 2) + 1e-20)


def panned(x, pan_db):
    return x * gain_from_db(np.array([[.5], [-.5]]) * pan_db)


def add(out, s, x):
    part = out[:, round(s * SR):][:, :x.shape[-1]]
    part += x[..., :part.shape[1]]


def scene():
    work = blows() + taps() + rustle()
    behind = whine() + dog() + birds() + traffic() + crickets() + air()
    return work + wind() + pops() + behind


def top_cut(x):
    return signal.sosfilt(signal.butter(12, 16500, fs=SR, output="sos"), x)


def record(dry):
    clipped = dry / (1 + np.abs(dry) ** 6) ** (1 / 6)
    mix = filtered(clipped, lambda hz: 1 / (1 + (hz / TOP_HZ) ** 80))
    return top_cut(mix)


dry = scene()
out = record(dry)
to_wav(out)
```